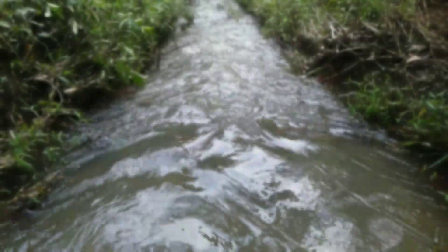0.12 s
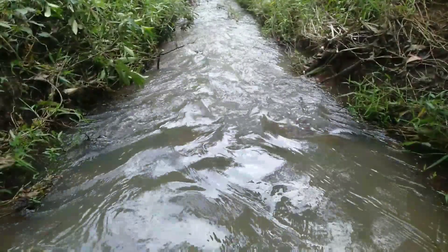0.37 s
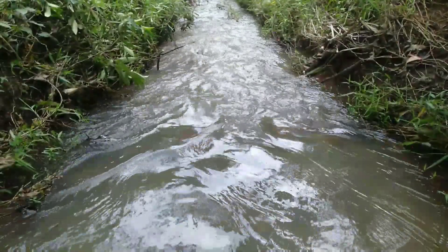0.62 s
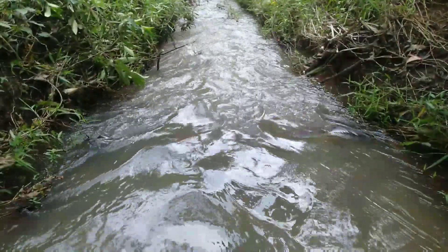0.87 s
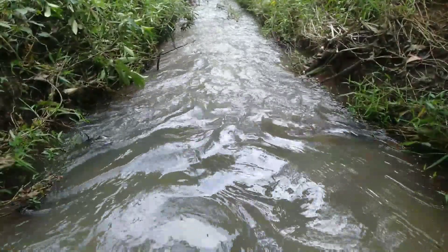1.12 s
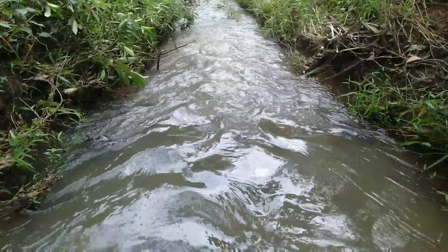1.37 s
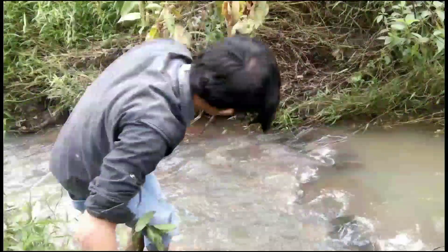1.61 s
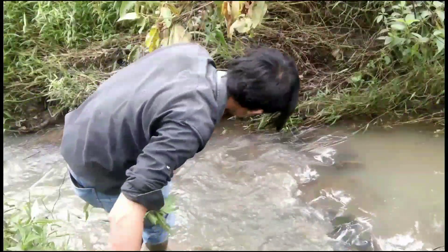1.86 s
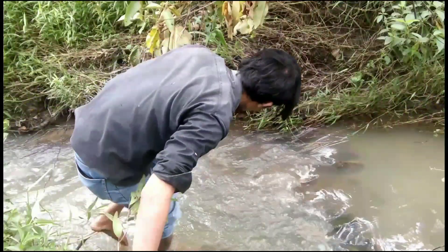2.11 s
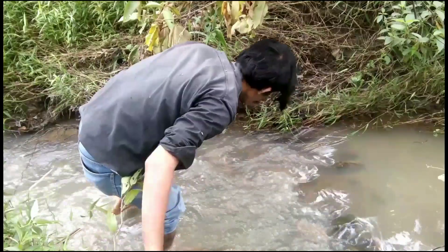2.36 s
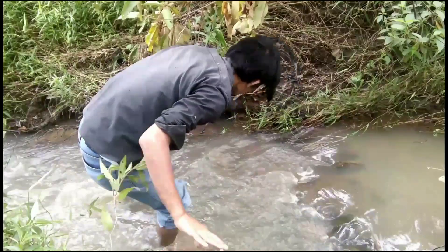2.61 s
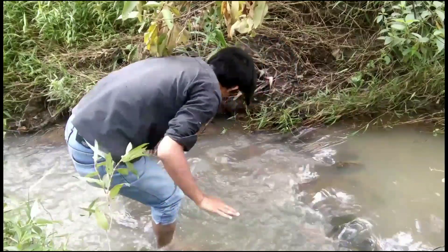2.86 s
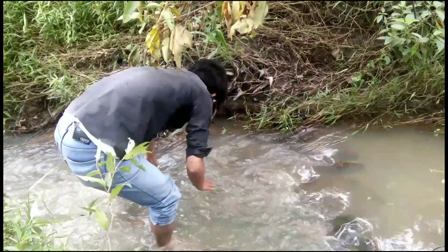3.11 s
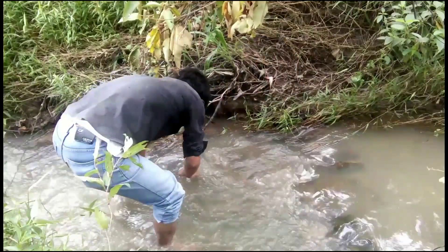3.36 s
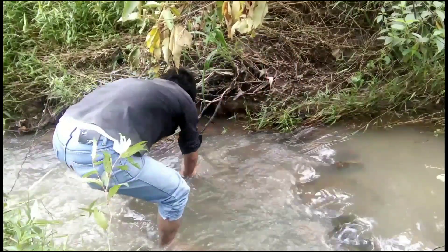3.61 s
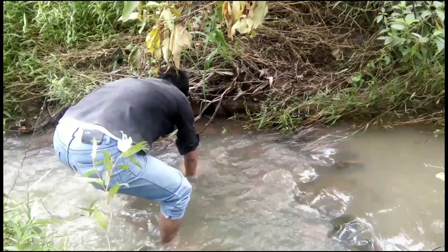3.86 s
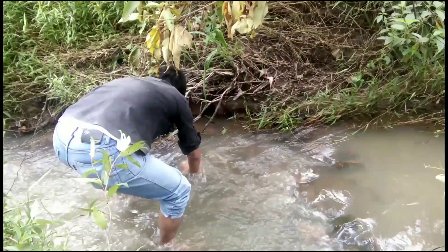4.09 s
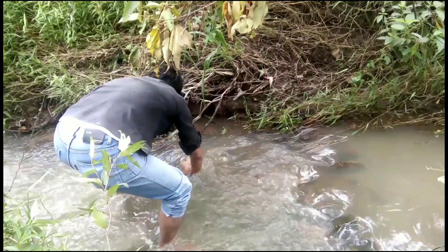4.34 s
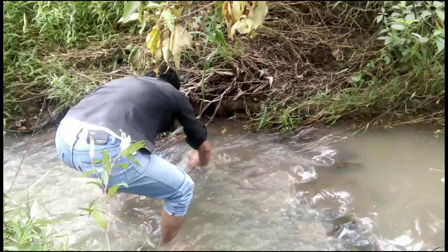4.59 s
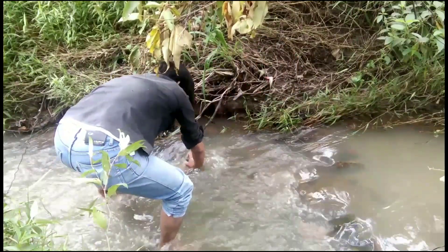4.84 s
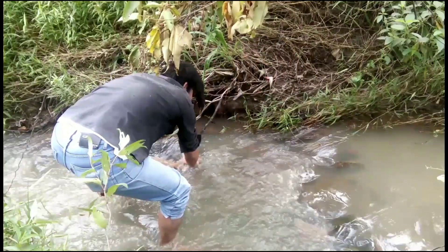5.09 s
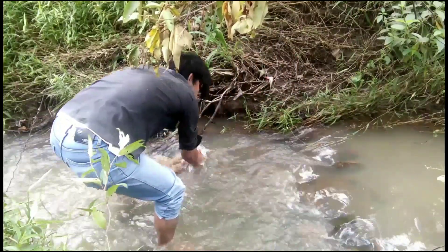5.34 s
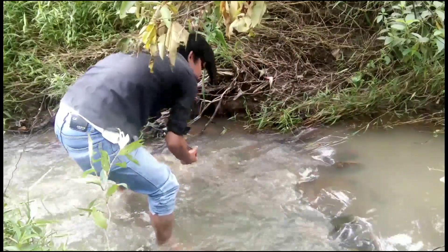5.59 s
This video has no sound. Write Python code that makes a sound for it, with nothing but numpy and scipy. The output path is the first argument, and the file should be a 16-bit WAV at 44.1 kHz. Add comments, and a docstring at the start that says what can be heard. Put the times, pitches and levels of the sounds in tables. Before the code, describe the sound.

Outdoors, a shallow fast stream rushes continuously. For about a second and a half it is an airy, thin wash with low wind rumble and a few faint bubbles. A very loud, brief pop marks an abrupt change, then the water is closer, duller on top and slightly louder, with a metallic ring near 5 kHz and many quick splashes, plips and gurgles until the end. Mono.

```python
"""A shallow, fast stream, heard from two spots that are joined by a sharp pop. First comes the view upstream
through a wide, thin microphone with wind rumble, then the riffle close by, duller and ringing near 5 kHz.
The water is filtered noise (a wash), a crowd of small bubble tones, a finer fizz and droplet ticks.
Large bubbles (rising tones), splashes (ringing noise) and spray (bright puffs) stand out one by one."""
import sys
import numpy as np
from scipy import signal
from scipy.io import wavfile
from scipy.ndimage import uniform_filter1d

SR = 44100
rng = np.random.default_rng(int(sys.argv[2]) if len(sys.argv) > 2 else 0)


def magnitude_from_level(level_db):
    """Linear magnitude for a level in decibels (20 dB per decade)."""
    exponent = np.asarray(level_db, float) / 20
    return 10 ** exponent


def bounce(signal):
    """Save signal as a 16-bit WAV file at the path given by the first command-line argument."""
    frames = np.transpose(np.atleast_2d(signal))
    limited = np.clip(frames, -1, 1)
    pcm = np.round(limited * 32767).astype(np.int16)
    wavfile.write(sys.argv[1], SR, pcm)


N = 251811  # length in samples

# Colour of water and microphone at each spot. Each row: pitch in Hz, relative level per Hz in dB.
UPSTREAM_COLOUR = [(20, -3.5), (45, 2), (65, -2.5), (170, -1.5), (333, -12.5), (491, -12), (597, -15.5),
                   (1150, -6.5), (2920, -17), (4800, -24.5), (6190, -18.5), (6950, -13), (8400, -24.5),
                   (11500, -27.5), (15500, -18.5)]
RIFFLE_COLOUR = [(20, -15), (38, -24), (78, -7.5), (103, -5.5), (133, 2), (219, -7.5), (560, -8),
                 (932, -6.5), (3300, -9.5), (4300, -5.5), (5000, -0.5), (5850, -7), (8200, -33),
                 (9100, -35), (9750, -33), (10300, -37), (12900, -41.5), (15500, -38.5)]
# Flow of the water at each spot. Each row: time in seconds, level in dB, gurgle over the wash in dB.
UPSTREAM_FLOW = [(0.0, -37.5, -12), (0.43, -39, -10.5), (0.9, -36.5, -14), (1.36, -38, -8), (1.6, -37, -8)]
RIFFLE_FLOW = [(1.65, -35, -5), (1.8, -35, -11.5), (2.46, -33.5, -14.5), (3.79, -33, -12.5),
               (4.01, -33.5, -14), (4.87, -33, -11), (5.22, -33.5, -13), (5.71, -32, -17.5)]
# Splashes that stand out. Each row: start in seconds, peak in dB, pitch in Hz.
SPLASH_EVENTS = [(0.7394, -36, 5000), (1.432, -29.5, 4950), (1.769, -22.5, 4850), (1.8188, -21, 4870),
                 (1.8773, -25, 5000), (1.9413, -25, 4970), (2.245, -20, 4840), (2.287, -26, 5110),
                 (2.339, -18, 4930), (2.7129, -22, 5130), (2.7828, -20.5, 5440), (2.9586, -15.5, 4950),
                 (3.339, -24, 4850), (3.451, -22, 5270), (3.5358, -25.5, 5160), (3.642, -19.5, 4420),
                 (3.796, -20, 4660), (3.8657, -20, 4340), (3.9411, -20, 5150), (4.135, -23, 4850),
                 (4.2988, -23, 5100), (4.3252, -21, 4900), (4.382, -24, 5000), (4.4423, -23, 4600),
                 (4.642, -21, 5000), (4.819, -22, 5340), (4.5394, -16.5, 4540), (4.6018, -21, 4300),
                 (4.674, -18, 4650), (4.825, -16, 5300), (4.913, -24, 4690), (5.012, -30.5, 4950),
                 (5.2905, -19, 4860), (5.4235, -18.5, 4800), (5.455, -24, 4890), (5.572, -22.5, 4470),
                 (5.6855, -25, 4570)]
# Bubbles that stand out. Each row: start in seconds, peak before the throb in dB, start pitch in Hz,
# length in ms, rise of pitch as a share of the start pitch.
BUBBLE_EVENTS = [(0.6852, -31, 1115, 9.5, 0.18), (0.6934, -38, 618, 26, 0.19),
                 (0.8156, -35.5, 590, 31, 0.81), (0.8411, -32, 830, 9.4, 0.68),
                 (1.0071, -38.5, 940, 34, 0.05), (1.0776, -34, 880, 28, 0.86), (1.1317, -32, 1258, 6.1, 0),
                 (1.2636, -35.5, 470, 42, 0.24), (1.2722, -35, 570, 10.5, 0.26),
                 (1.33, -32.5, 1370, 4.9, 0.03), (1.7187, -26, 1310, 6.5, 0.056),
                 (1.7926, -33.5, 1733, 6.3, 0.24), (1.8382, -35.5, 1150, 15, 0.15),
                 (1.848, -37, 431, 27, 0.052), (1.9194, -39, 636, 39, 0.055),
                 (2.2867, -34, 1270, 22, 0.086), (2.277, -40.5, 296, 46, 0.16),
                 (2.3025, -30.5, 1579, 5.5, 0.27), (2.3399, -27.5, 2630, 2.8, 0),
                 (2.3752, -39, 444, 29, 0.54), (2.9905, -36, 1180, 12, 0.18),
                 (4.3821, -29, 1040, 7.1, 0.13), (2.7335, -40, 393, 30, 0.86),
                 (2.8761, -35, 253, 21, 0.065), (2.88, -37.5, 271, 36, 0.9), (3.01, -33, 837, 14, 1),
                 (3.2551, -31, 596, 14, 0.021), (3.4241, -31.5, 648, 48, 0.3), (3.4484, -35, 775, 13, 0.56),
                 (3.588, -31.5, 1135, 9.8, 0.71), (3.7696, -29, 650, 12.6, 0.073),
                 (4.3266, -30, 1690, 6.1, 0.086), (4.3483, -31, 1120, 5.7, 0.69),
                 (4.4076, -29, 2500, 5.2, 0.039), (4.4386, -34, 686, 15, 0), (4.5703, -31, 1440, 6.2, 0),
                 (4.6078, -28, 2218, 3.4, 0.37), (4.7518, -33.5, 1856, 12, 0), (4.8043, -29, 3015, 2.5, 0),
                 (4.8289, -30, 2600, 4.2, 0), (4.8339, -36.5, 408, 28, 0.08),
                 (4.8657, -29, 1050, 5.5, 0.12), (4.9264, -38.5, 308, 30, 0.12),
                 (5.1137, -31.5, 455, 38, 0.11), (5.1182, -32, 968, 4.8, 0.39),
                 (5.187, -28, 2070, 5.5, 0.53)]
# Spray ticks heard in the treble. Each row: start in seconds, peak in dB, pitch in Hz.
SPRAY_EVENTS = [(0.5132, -35, 14000), (0.5886, -33, 14000), (0.9083, -33, 14000), (0.9537, -30.5, 7000),
                (1.3738, -36, 14000), (1.8366, -38, 9000), (1.8766, -39, 7500), (2.1201, -44, 9000),
                (2.2914, -45, 10000), (2.3386, -38, 12300), (2.4932, -46, 13500), (2.5364, -44, 10300),
                (2.7836, -41, 7800), (2.8764, -40, 8500), (3.0734, -47, 10500), (3.26, -44, 10600),
                (3.3584, -41, 12000), (3.7943, -43, 8500), (4.3291, -43, 11500)]

JOIN_S = 1.62193  # the moment the second spot takes over, in seconds
HEAVE_HZ = 12900  # the treble swells and ebbs, the more the higher: full depth from this pitch up
SPLASH_RISE_S, SPLASH_T60_S = 0.00012, 0.036  # rise time, and time to fade by 60 dB for a -20 dB splash
LONGER_PER_DB = 0.02  # share by which a splash rings longer for each dB it is louder
SLAP = 15  # size of the first touch of a splash, against its noise
SPRAY_T60_S, SPRAY_WIDTH = 0.014, 1.11  # time to fade by 60 dB, band edges as a ratio of the pitch
POP_DB, POP_HZ, POP_T60_S = 1.2, 4400, 0.0011  # level before fading, swings per second, 60 dB fade time
EDGE_HZ = 15600  # upper edge of the sound


def water(colour, flow, patchy_db, flicker_db, heave_db, fizz_db, ticks_db):
    """Wash, bubbles, fizz and droplet ticks, through the colour of one spot and on its flow."""
    seconds, level_points, gurgle_points = np.transpose(flow)
    t = np.arange(N) / SR
    level_db = np.interp(t, seconds, level_points)
    gurgle_db = np.interp(t, seconds, gurgle_points)
    clumps = surges(depth_db=6, ms=8) * surges(depth_db=2.5, ms=45)  # shared by fizz and ticks
    gurgle_rate = 700 * surges(depth_db=4, ms=30)  # bubbles per second
    gurgle = babble(336.7, 2492, per_s=gurgle_rate, cycles=12.1, spread_db=3.5)
    fizz = babble(2520, 15000, per_s=2200 * clumps, cycles=8.7, spread_db=3.0)
    ticks = evened(strewn(400 * clumps, 4.5) * rng.choice([-1., 1.], N))
    mix = wash(patchy_db, flicker_db, heave_db)
    mix += magnitude_from_level(gurgle_db) * gurgle
    mix += magnitude_from_level(fizz_db) * fizz
    mix += magnitude_from_level(ticks_db) * ticks
    return magnitude_from_level(level_db) * evened(coloured(mix, colour))


def wash(patchy_db, flicker_db, heave_db):
    """White noise in drifting patches, with a flicker shared by all pitches and a treble that heaves."""
    frames = N // 128 + 5  # one frame per 128 samples
    # four random maps of pitch (axis 0) by time (axis 1)
    real, imag, patches, heave = rng.standard_normal((frames, 257, 4)).T
    patches = uniform_filter1d(uniform_filter1d(patches, size=8, axis=0), size=14, axis=1)
    heave = uniform_filter1d(uniform_filter1d(heave, size=50, axis=0), size=22, axis=1)
    flicker = evened(uniform_filter1d(rng.standard_normal(frames), size=3))
    depth = np.minimum(np.fft.rfftfreq(512, 1 / SR)[:, None] / HEAVE_HZ, 1) ** 2
    change_db = patchy_db * evened(patches) + flicker_db * flicker + heave_db * depth * evened(heave)
    spectrum = (real + 1j * imag) * magnitude_from_level(change_db)
    return evened(signal.istft(spectrum, nperseg=512, noverlap=384)[1][:N])


def babble(low_hz, high_hz, per_s, cycles, spread_db):
    """A crowd of bubbles of all sizes; small ones are high, short and more frequent."""
    out = np.zeros(N)
    pitches = np.geomspace(low_hz, high_hz, num=28)
    for hz in pitches:
        longer, rise = rng.random(size=2)
        ms = 1000 * cycles * (0.5 + longer) / hz
        tone = bubble(hz, ms, 0.34 * rise)
        starts = strewn(per_s * hz / pitches.sum(), spread_db)
        out += signal.oaconvolve(starts, tone)[:N]
    return evened(out)


def bubble(hz, ms, rise):
    """A bubble's tone: quick swell, slower fade, pitch climbing as it nears the surface."""
    u = np.linspace(0, 1, max(round(ms * SR / 1000), 8))  # share of the bubble's life
    turns = hz * ms / 1000 * (u + rise * u ** 2 / 2)
    return np.sin(np.pi * u ** 0.7) * np.sin(2 * np.pi * turns)


def strewn(per_s, spread_db):
    """Random moments, at a rate that may change, with mostly small and a few large sizes."""
    when = rng.random(N)
    size = rng.exponential(1, N)
    return (when < per_s / SR) * magnitude_from_level(spread_db * np.minimum(size, 3.5))


def surges(depth_db, ms):
    """Water arrives in clumps: a random factor on the rate of bubbles or ticks, 1 on average."""
    span = round(ms * SR / 1000)
    drift = uniform_filter1d(uniform_filter1d(rng.standard_normal(N), span), span)
    factor = magnitude_from_level(depth_db * evened(drift))
    return factor / factor.mean()


def coloured(x, points):
    """Causal filter with the given spectrum, so that ticks ring after they land."""
    hz, db = np.transpose(points)
    size = 8192
    f = abs(np.fft.fftfreq(size, 1 / SR))
    log_gain = np.log(magnitude_from_level(np.interp(np.log(f + 1), np.log(hz + 1), db)))
    # the Hilbert transform of the log gain gives the phase that rings only afterwards
    response = np.exp(np.conj(signal.hilbert(log_gain)))
    taps = np.fft.ifft(response).real[:size // 2]
    return signal.oaconvolve(x, taps)[:len(x)]


def evened(x):
    """Scales to rms 1, so that a level applied later means what it says."""
    return x / np.sqrt(np.mean(x ** 2) + 1e-20)


def splashes():
    """Each slap of water is a rounded burst of noise that rings around its own pitch."""
    out, t = np.zeros(N + SR), np.arange(2000) / SR
    noises = rng.standard_normal((len(SPLASH_EVENTS), len(t)))
    for (s, db, hz), noise in zip(SPLASH_EVENTS, noises):
        ring = signal.butter(3, [hz / 1.06, hz * 1.123], "band", fs=SR, output="sos")
        t60 = SPLASH_T60_S * np.exp(LONGER_PER_DB * (db + 20))
        swell = (1 - np.exp(-t / SPLASH_RISE_S)) * magnitude_from_level(-60 * t / t60)
        burst = swell * signal.sosfilt(ring, noise + SLAP * (t == 0))
        out[round(s * SR):][:len(t)] += magnitude_from_level(db) * burst / abs(burst).max()
    return out[:N]


def loud_bubbles():
    """The large bubbles, one by one; the heaving surface makes each one throb."""
    out = np.zeros(N + SR)
    throbs = rng.random((len(BUBBLE_EVENTS), 2))
    for (s, db, hz, ms, rise), (speed, start) in zip(BUBBLE_EVENTS, throbs):
        tone = bubble(hz, ms, rise)
        throb_hz = 60 + 60 * speed
        throb = 1 + 0.24 * np.sin(2 * np.pi * (throb_hz * np.arange(len(tone)) / SR + start))
        out[round(s * SR):][:len(tone)] += magnitude_from_level(db) * throb * tone
    return out[:N]


def spray():
    """Flung droplets land as puffs of treble noise that die in milliseconds."""
    out, t = np.zeros(N + SR), np.arange(2000) / SR
    noises = rng.standard_normal((len(SPRAY_EVENTS), len(t)))
    for (s, db, hz), noise in zip(SPRAY_EVENTS, noises):
        edges = [hz / SPRAY_WIDTH, min(hz * SPRAY_WIDTH, EDGE_HZ)]
        band = signal.butter(1, edges, "band", fs=SR, output="sos")
        hiss = signal.sosfilt(band, signal.sosfilt(band, noise))  # twice, for steeper sides
        puff = magnitude_from_level(-60 * t / SPRAY_T60_S) * hiss
        out[round(s * SR):][:len(t)] += magnitude_from_level(db) * puff / abs(puff).max()
    return out[:N]


def pop():
    """A single damped swing, steep at its start, where the two spots meet."""
    turn = np.clip((np.arange(N) / SR - JOIN_S) * POP_HZ, 0, 1)  # share of the one swing
    fade_db = 60 * turn / POP_HZ / POP_T60_S
    return magnitude_from_level(POP_DB - fade_db) * np.sin(2 * np.pi * turn ** 0.85)


def scene():
    """The first spot stops dead; the second swells in over a few hundredths of a second."""
    t = np.arange(N) / SR - JOIN_S
    far = water(UPSTREAM_COLOUR, UPSTREAM_FLOW, patchy_db=0.4, flicker_db=0.5, heave_db=1.7,
                fizz_db=-11.0, ticks_db=-9.5)
    near = water(RIFFLE_COLOUR, RIFFLE_FLOW, patchy_db=1.1, flicker_db=1.04, heave_db=3.0,
                 fizz_db=-8, ticks_db=-9)
    swell = np.clip(0.39 + t / 0.045, 0, 1)
    stream = np.where(t < 0, far, swell * near)
    mix = stream + splashes() + loud_bubbles() + spray() + pop()
    return mix[None]  # one channel


def top_cut(x):
    """Nothing passes above the cut-off."""
    return signal.sosfilt(signal.butter(12, 16830, fs=SR, output="sos"), x)


def record(dry):
    """Limits the band: a steep low-pass filter takes away what lies above the upper edge."""
    low_pass = signal.firwin(511, EDGE_HZ, window=("kaiser", 9), fs=SR)
    limited = signal.oaconvolve(dry, low_pass[None], "same")
    return top_cut(limited)


dry = scene()
out = record(dry)
bounce(out)
```